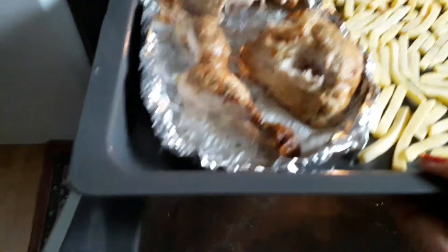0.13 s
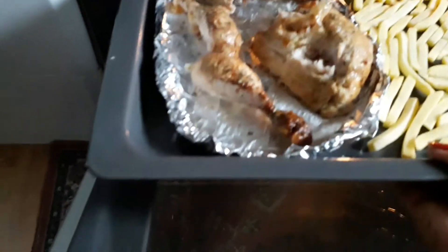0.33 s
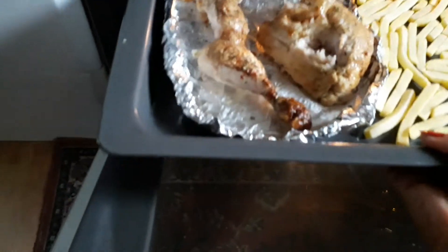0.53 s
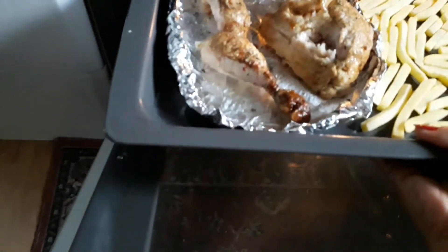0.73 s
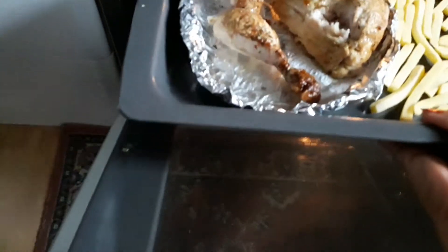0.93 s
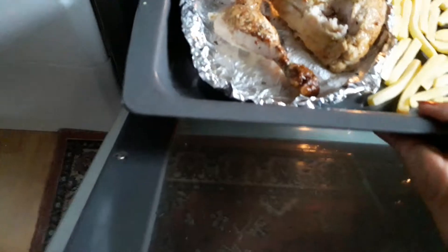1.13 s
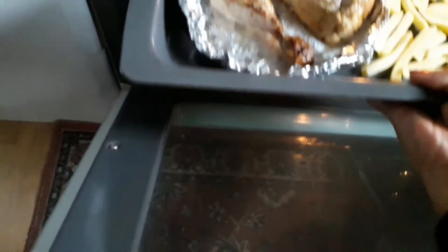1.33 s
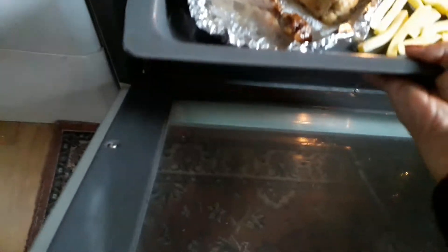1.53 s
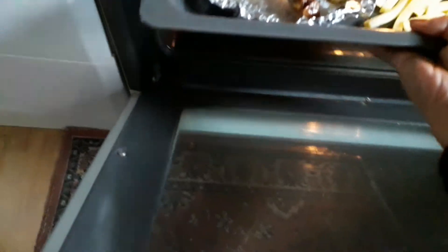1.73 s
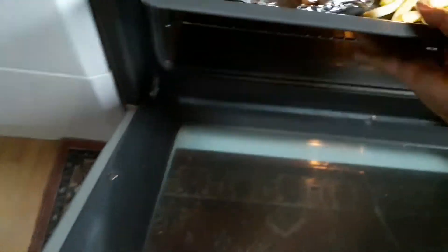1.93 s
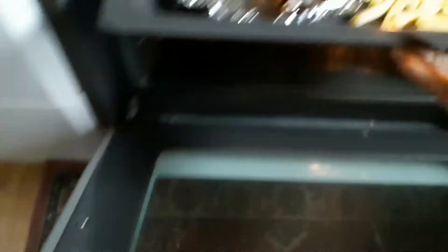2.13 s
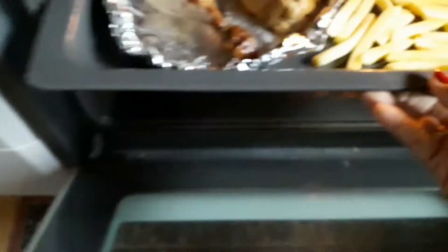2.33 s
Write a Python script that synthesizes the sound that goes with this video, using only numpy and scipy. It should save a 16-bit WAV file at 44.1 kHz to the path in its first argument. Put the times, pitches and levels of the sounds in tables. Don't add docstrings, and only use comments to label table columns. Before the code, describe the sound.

A metal baking tray knocks on oven runners: quick uneven clanks from 0 to 0.35 s, the loudest bouncing clatter at 0.5 s with hollow boom and ringing rails, softer knocks around 0.9 and 1.1 s. Faint foil crackles near 1.25 s. A scraping, rumbling slide swells from 1.65 to 2.0 s, then stops; sizzling fat spits and pops until the end. Close, dry, faint kitchen hum.

```python
import sys
import numpy as np
from scipy import signal
from scipy.io import wavfile
from scipy.ndimage import uniform_filter1d

SR = 44100
rng = np.random.default_rng(int(sys.argv[2]) if len(sys.argv) > 2 else 0)


def transcribe(u):
    v = np.clip(np.atleast_2d(u).T, -1, 1)
    q = np.round(v * 32767).astype(np.int16)
    wavfile.write(sys.argv[1], SR, q)


def nominal_scale(level):
    x = np.asarray(level, float) / 20
    return 10 ** x


N = 105840

# start_s [s], clatter_db [dB], boom_db [dB], edge_db [dB], boom_tilt [dB per octave]
KNOCKS = [(0.003, -23, -8.5, -23, -20), (0.028, -26.5, -26, -21, 0), (0.059, -15, -32, -17.5, 18),
          (0.119, -22.5, 2, -24, 7), (0.214, -14, -4.5, -20, -6), (0.2336, -13, -8, -18, 22),
          (0.264, -12, -7.5, -14.5, -2), (0.291, -40.5, -10, 5, 17), (0.342, -23.5, 0, -26.5, -0.5),
          (0.497, -3.5, -4.5, -12.5, 2), (0.505, -19, 4.5, -25.5, 3), (0.513, -11.5, 3, -8.5, 11),
          (0.525, -16.5, 5, -12, -1.5), (0.544, -21, -2, -11, -4.5), (0.586, -25.5, 4.5, -11, 6),
          (0.874, -20, -0.5, -16.5, -2), (0.892, -20.5, -6, -17, 5), (0.915, -23.5, 2.5, -15.5, -3),
          (0.98, -30.5, 6.5, -21, 1), (1.013, -24, -12, -13, 0), (1.1095, -35, -4, -9.5, -16),
          (1.123, -29, -5.5, -14.5, -8.5), (1.694, -34, -15, -14, -15), (1.919, -39, -6, -1.5, 0)]
# pitch_hz [Hz], level_db [dB], t60_s [s]
WALL_MODES = [(100.4, -23, .15), (122.2, -2.5, 0.37), (150, -13, 0.3), (191.3, -0.5, 0.14),
              (221, -17, 0.41), (245.5, 2, 0.17), (283, -2.5, 0.15), (317.5, -9, 0.42), (353, -11.5, 0.22),
              (427, -16, 0.41), (465, -23.5, .25), (545, -21, 0.39), (550, -27.5, 0.22)]
# pitch_hz [Hz], width_hz [Hz], level_db [dB]
SHEET_MODES = [(991, 16, -16.5), (1198, 20, -12.5), (1340, 32, -13), (1562, 52, -5.5), (1885, 30, -7),
               (2050, 12, -21.5), (2426, 280, 5.5), (2800, 55, -21.5), (3000, 73, -21.5), (3230, 370, -3),
               (3720, 390, 6.5), (4460, 20, -14.5)]
# freq_hz [Hz], level_db [dB]
CLATTER_COLOUR = [(290, -17), (500, 8), (652, -4), (984, -2.5), (1700, -6.5), (2190, -9), (2470, -6),
                  (3030, -2.5), (9000, -24.5), (11700, -50), (19800, -120)]
# freq_hz [Hz], level_db [dB]
EDGE_COLOUR = [(2940, -20), (5000, 0.5), (7240, -5), (10300, -2), (13500, -11.5), (15800, -14)]
# start_s [s], gain_db [dB]
RESTS = [
    (.19, -16),
    (0.401, 3),
    (0.564, -10),
    (.622, 0.5),
    (0.998, -42),
    (1.196, -3),
]
# time_s [s], level_db [dB]
RUB_LEVEL = [(0, -47), (.19, -56.5), (.3, -56), (.45, -52), (.63, -57), (.85, -56.5), (1.06, -56.5),
             (1.43, -54), (1.67, -46), (1.7, -44), (1.85, -45), (1.94, -44), (1.965, -53), (1.985, -48.5),
             (2.032, -50), (2.075, -63), (2.2, -74.5), (2.4, -87.5)]
# freq_hz [Hz], level_db [dB]
RUB_COLOUR = [(180, -37), (300, -5), (553, -19.5), (647, -7.5), (1500, -3), (1630, -4.5), (2080, -5),
              (3420, -6.5), (9000, -21.5), (11700, -37), (19800, -120)]
# time_s [s], level_db [dB]
WEIGHT_LEVEL = [(0, -30.5), (.19, -43.5), (.3, -30.5), (.45, -47), (.63, -40.5), (.85, -48), (1.06, -44.5),
                (1.43, -56), (1.58, -47), (1.69, -41.5), (1.74, -48.5), (1.81, -44), (1.87, -49),
                (1.925, -43.5), (2.015, -44), (2.046, -55.5), (2.1, -64), (2.23, -74)]
# freq_hz [Hz], level_db [dB]
RUMBLE_COLOUR = [(35, -46), (60, 1.5), (107, -2.5), (187, -6), (247, -2.5), (318, -21), (550, -9),
                 (600, -9), (780, -51.5), (1320, -120)]
# time_s [s], level_db [dB]
SIZZLE_LEVEL = [(0, -75), (.2, -72), (.48, -58), (.7, -60.5), (.86, -60), (.89, -49.5), (1.09, -54),
                (1.13, -48), (1.21, -55.5), (1.25, -52.5), (1.43, -54), (1.65, -48.5), (1.8, -42.5),
                (1.94, -44.5), (1.965, -44), (2.1, -43), (2.2, -44.5), (2.4, -50.5)]
# freq_hz [Hz], level_db [dB]
SIZZLE_COLOUR = [(880, -76.5), (1500, -44.5), (4010, -21), (4760, -16), (6800, -15), (7800, -17),
                 (12500, -9), (15900, -12.5), (16500, -30)]
# pitch_hz [Hz], t60_s [s], level_db [dB]
FOIL_CREASES = [(9900, .004, -27), (11050, .004, -28), (13000, .003, -27)]
# start_s [s], level_db [dB]
POPS = [(2.0107, -29), (2.0148, -28), (2.0393, -28), (2.0491, -29), (2.0715, -29), (2.0831, -23),
        (2.0962, -26), (2.1052, -23), (2.1103, -24), (2.1159, -20), (2.1211, -20), (2.138, -28),
        (2.1435, -27), (2.1583, -26), (2.1633, -24), (2.1728, -28), (2.1885, -29), (2.2162, -26),
        (2.2237, -28), (2.2649, -27), (2.2747, -31), (2.3102, -28), (2.3343, -29), (2.3619, -33),
        (2.3827, -33)]
# freq_hz [Hz], level_db [dB]
HUM_COLOUR = [(15, -31), (25, -1), (48, 4.5), (240, -7), (430, -26), (515, -24), (1780, -27), (3000, -13.5),
              (3900, -49.5), (6600, -120)]
# start_s [s], pitch_hz [Hz], level_db [dB]
PINGS = [(0.06, 1037, -27), (0.12, 1390, -35), (0.214, 1034, -23.5), (0.218, 1550, -32.5),
         (0.234, 1066, -30), (.234, 3800, -29), (0.239, 1843, -25), (0.262, 4270, -26), (0.267, 1800, -31),
         (0.34, 1510, -36), (0.496, 1340, -17.5), (0.501, 3250, -17), (0.5251, 2540, -14),
         (0.722, 2730, -47), (.873, 2300, -45), (0.874, 3740, -31.5), (0.891, 3780, -49),
         (0.983, 1400, -33), (.982, 1965, -36.5), (1.122, 3720, -34), (1.696, 2034, -36.5),
         (1.71, 1110, -44), (1.745, 1520, -38.5), (1.76, 2220, -38.5), (1.885, 2330, -42),
         (1.909, 1506, -39)]
# start_s [s], level_db [dB], t60_s [s]
CRINKLES = [
    (0.7246, -48.5, .05),
    (1.2221, -49.5, 0.11),
    (1.245, -43.5, 0.25),
    (1.2879, -35.5, 0.065),
    (1.353, -48, .05),
    (1.9744, -36, 0.072),
]
# start_s [s], pitch_hz [Hz], level_db [dB], t60_s [s]
PANELS = [(0, 333, -27.5, 0.13), (.058, 318.6, -20, 0.098), (.06, 502, -28, .08), (.122, 561, -27, 0.15),
          (.14, 202, -32, 0.18), (.215, 124, -18, .2), (.215, 315, -16, 0.082), (.236, 339, -18.5, .15),
          (.262, 458, -25, 0.13), (.264, 307.3, -25, 0.12), (.343, 237, -21.5, .1), (.5, 572, -22.5, .2),
          (.54, 244, -13, 0.24), (.885, 513, -36, .15), (.92, 560, -35.5, 0.16), (1.128, 170.6, -33, 0.14),
          (1.6, 117, -44, 0.33), (1.7, 120, -44, 0.13), (.566, 126.8, -25.5, 0.32),
          (1.915, 203.5, -41, 0.16), (1.94, 113, -34, 0.15), (1.99, 118.5, -34, 0.19),
          (2.05, 130, -50.5, .4), (2.055, 190, -48.5, 0.26), (2.115, 230, -49, .2), (1.03, 150, -32, .2),
          (1.05, 229, -39, 0.45)]
# start_s [s], level_db [dB]
BUMPS = [
    (1.65, -42),
    (1.76, -35),
    (1.965, -46),
    (2.034, -46),
    (2.115, -42.5),
]

PUSH_S, BOOM_LAG_S, BOOM_DB, UNEVEN_DB = 0.0011, 0.00373, 3.5, 7
THUMP_HZ, THUMP_T60, THUMP_DB = 190, 0.012, 10.5
TICK_DB, CRACK_S, CRACK_DB = 11.5, 0.0055, -7.5
CLATTER_DB, CLATTER_T60, HIGH_T60 = -14.5, 0.22, 0.16
SHEET_DB, SHEET_DRIVE_T60 = -4.5, 0.11
EDGE_DB, EDGE_TAIL_DB, EDGE_T60 = -2.5, -4, 0.16
RUB_GRAINS_PER_S, RUB_SPREAD_DB, RUB_SMOOTH = 4800, -2, 0.86
SPITS_PER_S, SPIT_SPREAD_DB, SPIT_FROM_S, SPIT_SHARE = 900, 2.5, 2.04, 0.4
POP_S, POP_HZ = 0.00007, 11500
PING_T60, NEIGHBOUR_DB = 0.063, -12
HUM_DB, BUMP_S = -64, 0.0036
BASS_CUT_HZ, TOP_HZ, SIDE_DB = 97, 15760, -38


def evened(x):
    return x / np.sqrt(np.mean(x ** 2) + 1e-20)


def curve(rows):
    time_s, level_db = np.transpose(rows)
    return np.interp(np.arange(N) / SR, time_s, level_db)


def seconds(length_s):
    return np.arange(round(length_s * SR)) / SR


def add(mix, start_s, sound):
    part = mix[max(round(start_s * SR), 0):][:len(sound)]
    part += sound[:len(part)]


def highpassed(x, order, hz):
    return signal.sosfilt(signal.butter(order, hz, "high", fs=SR, output="sos"), x)


def colour(x, points):
    f, db = np.transpose(points)
    hz = np.abs(np.fft.fftfreq(4096, 1 / SR)) + 1
    gain_db = np.interp(np.log(hz), np.log(f), db)
    gain_db -= 30 * np.maximum(np.log2(f[0] / hz), 0)
    gain_db -= 30 * np.maximum(np.log2(hz / f[-1]), 0)
    log_gain = np.log(nominal_scale(np.maximum(gain_db, -100)))
    taps = np.fft.ifft(np.exp(np.conj(signal.hilbert(log_gain)))).real
    return signal.oaconvolve(x, taps / np.linalg.norm(taps))[:len(x)]


def ring(x, hz, t60):
    r = 10 ** (-3 / (t60 * SR))
    w = 2 * np.pi * hz / SR
    return signal.lfilter([0, np.sin(w)], [1, -2 * r * np.cos(w), r * r], x)


def grains(per_s, spread_db):
    size = nominal_scale(spread_db * np.minimum(rng.exponential(1, N), 4)) * rng.choice([-1, 1], N)
    return evened(size * (rng.random(N) < per_s / SR))


def wander(depth_db, smooth_samples):
    return nominal_scale(depth_db * evened(uniform_filter1d(rng.standard_normal(N), size=smooth_samples)))


def walls(drive, longer=1, extra_db=np.zeros(len(WALL_MODES))):
    return sum(nominal_scale(db + extra) * ring(drive, hz, t60 * longer)
               for (hz, db, t60), extra in zip(WALL_MODES, extra_db))


def choked(sound, start_s):
    t = np.arange(len(sound)) / SR
    for rest_s, gain_db in RESTS:
        if rest_s > start_s + 0.015:
            sound = sound * nominal_scale(gain_db * np.clip((t + start_s - rest_s) / 0.0027, 0, 1))
    return sound


def kitchen_hum():
    return nominal_scale(HUM_DB) * colour(rng.standard_normal(N), HUM_COLOUR)


def slide():
    slips = (1 - RUB_SMOOTH) * grains(RUB_GRAINS_PER_S, RUB_SPREAD_DB)
    slips = slips + RUB_SMOOTH * rng.standard_normal(N)
    scrape = evened(colour(slips * wander(1.5, 700), RUB_COLOUR))
    sheet = sum(nominal_scale(0.5 * db) * ring(slips, hz, 3.3 / width) for hz, width, db in SHEET_MODES)
    rub = evened(scrape + 0.5 * evened(sheet)) * nominal_scale(curve(RUB_LEVEL))

    jolts = rng.standard_normal(N) * wander(1.5, 1500)
    rumble = 0.65 * evened(walls(jolts, 0.5)) + evened(colour(jolts, RUMBLE_COLOUR))
    return rub + evened(rumble) * nominal_scale(curve(WEIGHT_LEVEL))


def sizzle():
    t = np.arange(N) / SR
    share = SPIT_SHARE * np.clip((t - SPIT_FROM_S) / 0.073, 0.2, 1)
    fizz = rng.standard_normal(N) + share * grains(SPITS_PER_S, SPIT_SPREAD_DB)
    hiss = colour(fizz * wander(1.1, 500) * nominal_scale(curve(SIZZLE_LEVEL)), SIZZLE_COLOUR)
    return hiss + sum(nominal_scale(db) * ring(hiss, hz, t60) for hz, t60, db in FOIL_CREASES)


def panel(hz, db, t60):
    t = seconds(0.3)
    return nominal_scale(db - 60 * t / t60) * np.sin(2 * np.pi * hz * t) * (1 - np.exp(-t * hz))


def wall_boom(start_s, boom_db, tilt_db):
    t = seconds(0.6)
    push = np.gradient(t * np.exp(-t / PUSH_S))
    place_db = UNEVEN_DB * rng.standard_normal(len(WALL_MODES))
    place_db += tilt_db * np.log2(np.array(WALL_MODES)[:, 0] / 200)
    thump = ring(push, THUMP_HZ * nominal_scale(0.37 * tilt_db), THUMP_T60)
    boom = walls(push, extra_db=place_db) + nominal_scale(THUMP_DB) * thump
    boom = np.interp(t - BOOM_LAG_S, t, boom)
    boom = boom / abs(boom).max() * nominal_scale(boom_db + BOOM_DB)
    return choked(boom, start_s)


def knock(start_s, db, boom_db, edge_db, tilt_db):
    t = seconds(0.6)
    body, bright = rng.standard_normal((2, len(t)))
    body[8] = bright[8] = nominal_scale(TICK_DB)
    crack = nominal_scale(CRACK_DB) * np.exp(-(t / CRACK_S) ** 2)

    dull = signal.sosfilt(signal.butter(2, 4200, fs=SR, output="sos"), body)
    rattle = dull * nominal_scale(-60 * t / CLATTER_T60) + (body - dull) * nominal_scale(-60 * t / HIGH_T60)
    clatter = colour(body * crack + rattle, CLATTER_COLOUR)
    drive = body * nominal_scale(-60 * t / SHEET_DRIVE_T60)
    sheet = sum(nominal_scale(level) * ring(drive, hz, 2.5 / width) for hz, width, level in SHEET_MODES)
    clatter_rms = np.sqrt(np.mean(clatter ** 2))
    clatter = clatter + nominal_scale(SHEET_DB) * 0.5 * evened(sheet) * clatter_rms

    edge = colour(bright * (crack + nominal_scale(EDGE_TAIL_DB - 60 * t / EDGE_T60)), EDGE_COLOUR)
    boom = wall_boom(start_s, boom_db, tilt_db)
    return nominal_scale(db) * (boom + nominal_scale(CLATTER_DB) * clatter + nominal_scale(EDGE_DB + edge_db) * edge)


def ping(hz, db):
    t60 = PING_T60 * (2000 / hz) ** 0.23
    t = seconds(0.2)
    pair = np.sin(2 * np.pi * hz * t) + nominal_scale(NEIGHBOUR_DB) * np.sin(2 * np.pi * hz * 1.045 * t)
    return nominal_scale(db - 60 * t / t60) * pair * (1 - np.exp(-t / 0.00033))


def crinkle(db, t60):
    t = seconds(0.1)
    return nominal_scale(db - 60 * t / t60) * highpassed(rng.standard_normal(len(t)), 2, 2800)


def bump(db):
    u = seconds(8 * BUMP_S) / BUMP_S
    return nominal_scale(db) * u ** 2 * np.exp(2 - 2 * u)


def pop(db):
    t = np.arange(-12, 30) / SR
    return nominal_scale(db) * np.exp(-(t / POP_S) ** 2) * np.cos(2 * np.pi * POP_HZ * t)


def scene():
    mix = kitchen_hum() + slide() + sizzle()
    for start_s, *row in PANELS:
        add(mix, start_s, choked(panel(*row), start_s))
    for row in KNOCKS:
        add(mix, row[0], knock(*row))
    for sound, events in ((ping, PINGS), (crinkle, CRINKLES), (bump, BUMPS), (pop, POPS)):
        for start_s, *row in events:
            add(mix, start_s, sound(*row))
    return np.array([mix, mix])


def low_pass(x):
    return signal.sosfilt(signal.butter(12, 16900, fs=SR, output="sos"), x)


def record(dry):
    thin = highpassed(dry, 3, BASS_CUT_HZ)
    band_edge = signal.firwin(1501, TOP_HZ, window=("kaiser", 7), fs=SR)
    thin = signal.oaconvolve(thin, band_edge[None], "same")
    treble = highpassed(np.roll(thin[0], 40), 4, 4000)
    apart = thin + nominal_scale(SIDE_DB) * np.outer([1, -1], treble)
    return low_pass(np.clip(apart, -1, 1))


dry = scene()
out = record(dry)
transcribe(out)
```